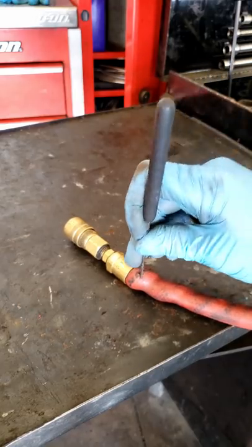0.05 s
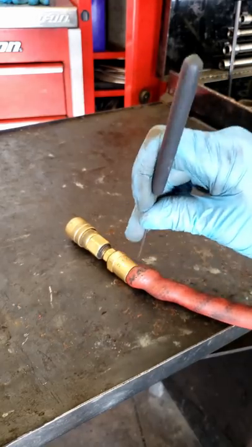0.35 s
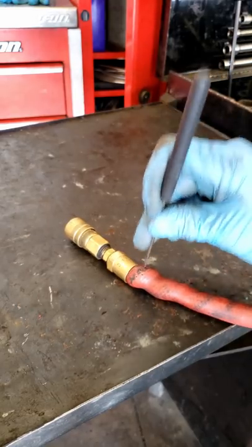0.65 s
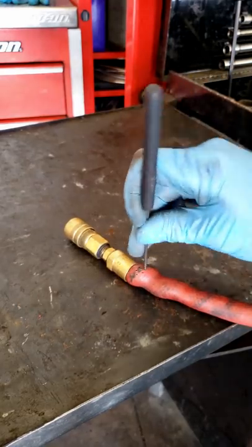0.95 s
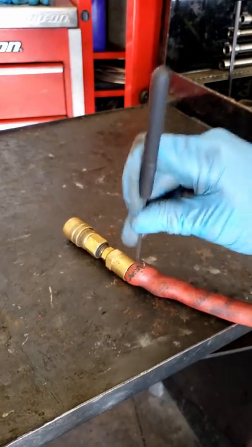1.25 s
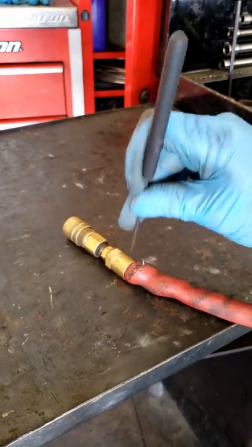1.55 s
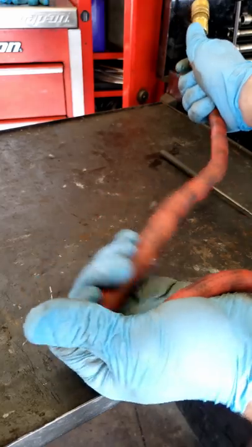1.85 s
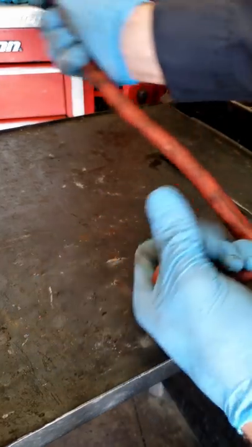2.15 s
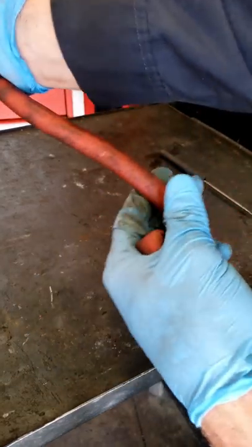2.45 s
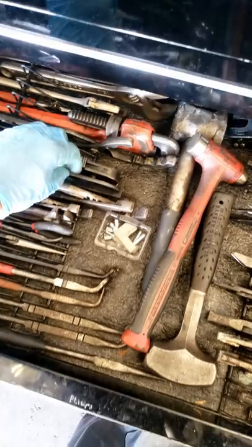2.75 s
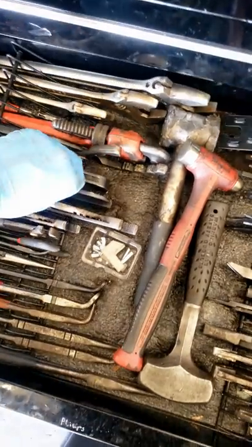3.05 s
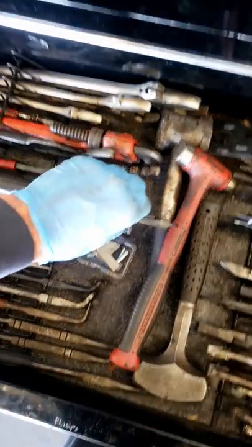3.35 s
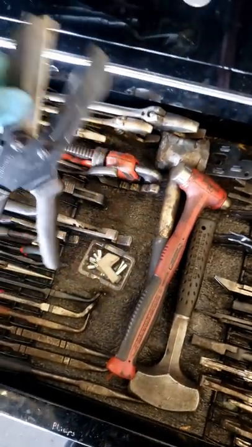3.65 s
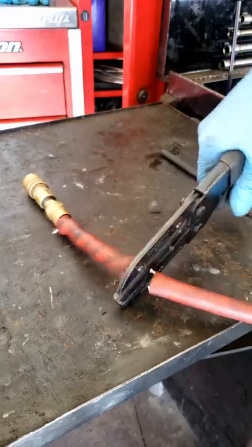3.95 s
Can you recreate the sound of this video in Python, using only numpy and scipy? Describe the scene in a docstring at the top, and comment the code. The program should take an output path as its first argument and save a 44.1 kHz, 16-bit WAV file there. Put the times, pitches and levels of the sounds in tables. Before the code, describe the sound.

Compressed air hisses loudly from a split hose close to the microphone, fluttering, then stops short. A faint leak lingers, a fan hums in the workshop, steel tools clink in a drawer, and the hiss bursts back.

```python
"""A loud, fluttering hiss stops short; then, abruptly, a fan hums, tools clink and a hiss breaks out.
Compressed air jets from a split hose beside its brass fitting while a gloved hand moves in the stream.
The hose is kinked shut, the workshop rings out, a little air seeps through and a far engine speeds up.
The second scene is at a tool chest beside the fan: steel tools knock together and ring as pliers are
pulled out, the drawer thumps, and the loud hiss returns."""
import sys
import numpy as np
from scipy import signal
from scipy.fft import rfft, irfft, next_fast_len
from scipy.io import wavfile
from scipy.ndimage import map_coordinates

SR = 44100
rng = np.random.default_rng(int(sys.argv[2]) if len(sys.argv) > 2 else 0)


def bounce(signal):
    """Save signal as a 16-bit WAV file at the path given by the first command-line argument."""
    frames = np.transpose(np.atleast_2d(signal))
    limited = np.clip(frames, -1, 1)
    pcm = np.round(limited * 32767).astype(np.int16)
    wavfile.write(sys.argv[1], SR, pcm)


N = 176400


def amp(db):
    """Turn decibels into a gain."""
    return 10 ** (np.asarray(db) / 20)


def unit(x):
    """Scale so that the average of the two channels has an rms level of 1."""
    return x / np.sqrt(np.mean(np.atleast_2d(x).mean(0) ** 2) + 1e-20)


def along(points, hz):
    """Read between (frequency [Hz], value) points on a log frequency axis."""
    freqs, values = np.transpose(points)
    return np.interp(np.log(hz + 1), np.log(freqs + 1), values)


def clock():
    """The time of every sample, in seconds."""
    return np.arange(N) / SR


def curves(rows):
    """One value per sample for each column after the time."""
    times, *columns = np.transpose(rows)
    return [np.interp(clock(), times, column) for column in columns]


def wobble(rate):
    """A smooth curve through `rate` random values a second."""
    return map_coordinates(rng.standard_normal(int(N * rate / SR) + 4), [clock() * rate], mode="nearest")


def filtered(x, response):
    """Multiply each frequency in x by response(hz)."""
    size = next_fast_len(N + 8192)
    return irfft(rfft(x, size) * response(np.fft.rfftfreq(size, 1 / SR)), size)[..., :N]


def pan(left_db):
    """Two gains that make the left side left_db louder than the right."""
    return amp(np.array([[.5], [-.5]]) * left_db)


def colour(points):
    """A tone colour: gain by frequency, from (frequency [Hz], level [dB]) points."""
    return lambda hz: amp(along(points, hz))


def resonant(points, peaks):
    """A broad tone colour with narrow resonances on it."""
    return lambda f: amp(along(points, f)
                         + sum(db / (1 + (2 * (f - hz) / width) ** 2) for hz, width, db in peaks))


def noise(gain, mono_hz=500):
    """Stereo noise of a given colour, alike on both sides below mono_hz."""
    def response(hz):
        spread = np.arccos(1 / (1 + (hz / mono_hz) ** 2)) / 2
        return gain(hz) * np.array([np.cos(spread), np.sin(spread)])
    mid, side = filtered(rng.standard_normal((2, N)), response)
    return unit(np.array([mid + side, mid - side]))


def add(track, start_s, sound):
    """Mix a sound into the track at start_s."""
    part = track[:, round(start_s * SR):][:, :sound.shape[-1]]
    part += sound[..., :part.shape[1]]


def lagged(x, lag_ms=0.28, top_hz=1060):
    """Low notes reach the right side first; above top_hz this head start fades away."""
    phase = lambda hz: np.pi * hz * lag_ms / 1000 / (1 + (hz / top_hz) ** 4)
    return filtered(x, lambda hz: np.exp(1j * phase(hz) * np.array([[-1], [1]])))


def workshop_echo(x):
    """The room rings on after a sound; each frequency dies at its own speed."""
    # how long the room rings: (frequency [Hz], time to fade by 60 dB [s])
    ring_times = [(150, 0.32), (1000, 0.69), (3500, 0.77), (8000, 0.82), (15000, 0.42)]
    hz, t, spectrum = signal.stft(rng.standard_normal((2, SR)), SR, nperseg=256)
    fade = amp(-60 * t / along(ring_times, hz)[:, None])
    tail = signal.istft(spectrum * fade, SR, nperseg=256)[1]
    return signal.fftconvolve(x.mean(0)[None], tail / np.linalg.norm(tail[0]), axes=1)[:, :N]


def distant_engine():
    """An engine fires faster and faster, so its drone rises over the quiet of the shop."""
    # the drone: (time [s], firing rate [Hz], lowest tone [dB], tone an octave up [dB])
    revs = [(1.55, 65.2, -88, -75), (1.76, 69.5, -60, -59.5), (1.92, 72.5, -54.5, -62.5),
            (1.96, 74, -55.5, -52.5), (2.24, 80, -47.5, -52), (2.32, 82.5, -49.5, -53.5),
            (2.6, 86.1, -49.5, -57.5), (2.7, 88.4, -52, -57.5)]
    # the quiet shop's noise: (frequency [Hz], relative level [dB])
    quiet_colour = [(18, -49), (30, -8), (50, -13.5), (85, -9), (171, -13.5), (355, -19), (716, -23),
                    (8690, -32.5), (15000, -52)]
    hz, first_db, second_db = curves(revs)
    phase = 2 * np.pi * np.cumsum(hz * (1 + 0.0051 * wobble(20))) / SR
    first, second, third = np.sin(np.outer([1, 2, 3], phase))
    tones = amp(first_db) * first + amp(second_db) * (second + amp(-16.5) * third)
    engine = np.sqrt(2) * tones * pan(left_db=2.5) * amp(0.67 * wobble(12.2))
    return engine + amp(-63) * noise(colour(quiet_colour), mono_hz=400) * pan(left_db=6.5)


def fan():
    """Rushing air with rough, unsteady motor and blade tones."""
    # loudness of the rushing air: (time [s], level [dB])
    levels = [(2.7, -36.5), (3.15, -35), (3.3, -41.5), (3.8, -41), (4, -41.5)]
    # its colour: (frequency [Hz], relative level [dB])
    air_colour = [(20, -18), (45, 3.5), (75, -3), (110, 5.5), (140, -4.5), (200, 5), (310, -10),
                  (700, -4.5), (1500, -8.5), (3500, -13), (5500, -18), (8000, -29), (12000, -26.5),
                  (15700, -27)]
    # motor and blade tones: (frequency [Hz], level over the air [dB])
    tones = [(109, -14.5), (172, -11.5), (242, -6.5), (280, -16), (333, -15), (388, -12.5), (500, -22),
             (609, -16), (724, -16), (917, -19.5)]
    # the air leans left: (frequency [Hz], left over right [dB])
    balance = [(200, 4.4), (800, 3.7), (3500, 6.1), (10000, 2)]
    hum = sum(amp(db + 2.5 * wobble(12)) * np.sin(2 * np.pi * hz * clock() + .8 * wobble(16))
              for hz, db in tones)
    air = noise(colour(air_colour), mono_hz=1040)
    air = unit(filtered(air, lambda hz: pan(along(balance, hz))))
    return amp(curves(levels)[0]) * (air + np.sqrt(2) * hum)


def hose_rumble(at_s=1.79, width_s=0.18, db=-55):
    """The rubber hose rumbles softly as it is lifted off the bench."""
    rumble = noise(colour([(60, -14), (130, 9.0), (260, -1.0), (430, -4), (700, -27)]))
    swell = np.exp(-((clock() - at_s) / width_s) ** 4)
    return rumble * amp(db + 1.4 * wobble(18)) * swell


def glove_rustle(at_s=2.895, width_s=0.042, db=-47):
    """The glove brushes over the tools."""
    rustle = noise(colour([(500, -20), (2800, 8), (7000, -6), (13000, -3)]))
    swell = np.exp(-((clock() - at_s) / width_s) ** 2)
    return rustle * pan(left_db=7) * amp(db + 2.4 * wobble(200)) * swell


def seeping_air():
    """A thin, hollow hiss gets past the kink."""
    # loudness of the leak: (time [s], level [dB])
    levels = [(2.36, -71), (2.42, -59), (2.46, -50), (2.55, -54), (2.65, -54), (2.72, -53), (3.15, -55),
              (3.35, -66)]
    # its colour: (frequency [Hz], relative level [dB])
    leak_colour = [(1000, -20), (2300, -13), (3400, -7.5), (4600, -7), (7000, -12), (9400, -12.5),
                   (11000, -3), (15500, -2)]
    # its resonances: (frequency [Hz], width [Hz], boost [dB])
    peaks = [(2800, 250, 3), (3490, 460, 5), (4300, 360, 2), (4780, 300, 5.5), (5600, 400, 3),
             (6700, 330, 6), (7800, 450, 1), (8670, 300, 6), (10100, 350, 3), (13000, 350, 1)]
    hiss = unit(noise(resonant(leak_colour, peaks)) * pan(left_db=11))
    return hiss * amp(curves(levels)[0] + 0.42 * wobble(20))


def drawer_thumps(attack_s=0.00098, scatter_db=.7):
    """The sheet-steel drawer booms; soft bumps stir only its lowest tones."""
    # bumps: (time [s], relative level [dB], tones weaken above [Hz])
    bumps = [(2.89, -37, 132), (3.1941, -12.5, 800), (3.202, -10.5, 850), (3.2106, -11, 850),
             (3.223, -7.5, 82), (3.2383, -30, 545), (3.383, -22, 99), (3.854, -23.5, 90), (3.881, -24, 90),
             (3.905, -19, 95), (3.947, -29, 130), (3.9615, -24.5, 403)]
    # the drawer's tones: (frequency [Hz], relative level [dB], time to fade by 60 dB [s])
    tones = [(62, -12, .08), (103, -1.8, .09), (174, -.6, .08), (225, -11, .14), (289, 2, .1),
             (352, 4.8, .04), (385, -9.7, .14), (498, -12, .12), (580, -13.5, .13), (728, -12, .11),
             (995, -18, .09), (1230, -18, .1)]
    out, t = np.zeros((2, N)), np.arange(SR // 3) / SR
    for start_s, db, soft_hz in bumps:
        boom = np.zeros_like(t)
        for hz, tone_db, fade_s in tones:
            fade = amp(tone_db + rng.normal(0, scatter_db) - 60 * t / fade_s)
            tone = np.sin(2 * np.pi * hz * (1 + rng.normal(0, 0.0046)) * t)
            boom += fade * tone / (1 + (hz / soft_hz) ** 2)
        add(out, start_s, amp(db + 1.5) * boom * (1 - np.exp(-t / attack_s)))
    return out * pan(left_db=3)


def steel_ring(tones):
    """Struck steel; each blow stirs its tones a little differently."""
    t = np.arange(SR // 3) / SR
    return sum(amp(db + rng.normal(0, 1.4) - 60 * t / fade_s)
               * np.sin(2 * np.pi * hz * t + rng.normal(0, 1.0, (2, 1))) for hz, db, fade_s in tones)


def tool_clinks(crack_fade_s=0.041, clatter_fade_s=0.15, attack_s=0.00047):
    """Each knock gives a bright crack, rings two tools and rattles the drawer's contents."""
    # knocks, in relative levels: (time [s], overall [dB], clatter [dB], heavy tool [dB], light tool [dB])
    knocks = [(3.0428, -21, 1.5, -9, -20), (3.059, -18, -2, -8, -4), (3.1675, -20, -7, -18, -6),
              (3.18, -11.5, -15.5, -16, -10), (3.183, -13.5, -15, 3.5, -12), (3.201, -21, 1, -12, -4),
              (3.2085, -17.5, -4.5, -7, -14), (3.2107, -15, -9, -19, -17), (3.3749, -22, -15, -16, 3.5),
              (3.9612, -22, -12, -18, -10)]
    # each tool's tones: (frequency [Hz], relative level [dB], time to fade by 60 dB [s])
    heavy_tool = [(1630, 0.5, 0.048), (3250, -12, .1), (4030, -20, 0.095), (5480, -12, 0.075),
                  (5846, -13, .05), (10350, -18, .035), (11100, -13, 0.1), (13800, -14, .05)]
    light_tool = [(2700, -17, .07), (6110, -3, 0.025), (11400, -4, 0.025), (13040, -14, .04)]
    # colours of the clatter and the crack: (frequency [Hz], relative level [dB])
    clatter_colour = [(60, -18), (200, -3), (380, 5.5), (750, 1), (1500, -7.5), (4000, -20), (12000, -49)]
    crack_colour = [(500, -46), (2500, 4.5), (6000, 2), (9000, -3.5), (13500, -1), (15700, -4.5)]
    crack_noise = noise(colour(crack_colour), mono_hz=1980)
    clatter_noise = noise(colour(clatter_colour), mono_hz=1460)
    out = np.zeros((2, N))
    for start_s, db, clatter_db, heavy_db, light_db in knocks:
        ring = amp(heavy_db) * steel_ring(heavy_tool) + amp(light_db) * steel_ring(light_tool)
        add(out, start_s, amp(db - 7.5) * ring)
        age = np.maximum(clock() - start_s, 0)
        crack = crack_noise * amp(-11 - 60 * age / crack_fade_s)
        clatter = clatter_noise * amp(clatter_db - 8.5 - 60 * age / clatter_fade_s)
        out += amp(db) * (1 - np.exp(-age / attack_s)) * (crack + clatter)
    return out * pan(left_db=5.5)


def air_spurts(attack_s=.001):
    """A bright hiss returns in steps that each start abruptly and fade."""
    # spurts: (time [s], level [dB], fade [dB/s], left over right [dB])
    spurts = [(3.836, -34, 60, 7), (3.961, -20, 750, 11), (3.969, -23, 35, 4), (3.9754, -17, 400, 7)]
    # their colour: (frequency [Hz], relative level [dB])
    spurt_colour = [(100, 2), (600, -4), (2000, -2.5), (3600, -2.5), (4500, -4.5), (5600, -1), (7200, -5),
                    (9000, -3), (12000, 3.5), (15500, 4)]
    # their resonances: (frequency [Hz], width [Hz], boost [dB])
    peaks = [(2960, 210, 8.5), (3550, 160, 5), (3900, 140, 8), (4750, 130, 5), (5300, 230, 4.5),
             (6130, 150, 9), (13400, 250, -1)]
    out = np.zeros((2, N))
    for start_s, db, fade_db_per_s, left_db in spurts:
        age = np.maximum(clock() - start_s, 0)
        hiss = unit(noise(resonant(spurt_colour, peaks)) * pan(left_db))
        out += hiss * amp(db - fade_db_per_s * age) * (1 - np.exp(-age / attack_s))
    return out


def hand_echo(x, delay_ms=1.119, drift=0.262, db=-14):
    """Sound bounces off the moving glove; the delayed copy gives the hiss a shifting colour."""
    delay_samples = delay_ms * np.exp(drift * wobble(3)) * SR / 1000
    echo = np.array([map_coordinates(side, [np.arange(N) - delay_samples]) for side in x])
    return (x + amp(db) * echo) / np.hypot(1, amp(db))


def air_jet(shut_s=1.954, shut_db_per_s=656):
    """Swirling air in three bands that swell as the hand deflects the stream, until the kink stops it."""
    # loudness of the low, middle and high bands: (time [s], relative level [dB])
    roar_levels = [(0, -47), (.108, -52), (.162, -43), (.29, -53), (.378, -44), (.496, -48), (.512, -53),
                   (.626, -38), (.658, -52.5), (.734, -38.5), (.782, -52.5), (.814, -42), (.87, -47),
                   (.896, -41.5), (.918, -45.5), (.972, -36.5), (.988, -42.5), (1.058, -38), (1.15, -44),
                   (1.28, -39), (1.448, -43), (1.474, -37.5), (1.502, -51), (1.522, -40), (1.712, -45.5),
                   (1.918, -46), (1.94, -49)]
    hiss_levels = [(0, -39), (.1, -42.5), (.178, -40.5), (.21, -34.5), (.27, -39), (.69, -39),
                   (.714, -32.5), (.77, -38.5), (1.01, -32.5), (1.188, -33), (1.232, -29.5), (1.36, -36),
                   (1.385, -29.5), (1.512, -37), (1.534, -29.5), (1.66, -37.5), (1.8, -38), (1.9, -34),
                   (1.94, -36)]
    sizzle_levels = [(.086, -29), (.134, -34.5), (.34, -28), (.382, -33), (.556, -27.5), (.594, -32),
                     (.702, -25), (.81, -28.5), (.998, -27.5), (1.512, -28), (1.528, -24.5), (1.614, -27.5),
                     (1.642, -24.5), (1.912, -24.5), (1.94, -28)]
    # the jet's colour: (frequency [Hz], relative level [dB])
    jet_colour = [(100, -38), (220, -21), (560, -18), (830, -14.5), (1200, -12.5), (1500, -12),
                  (2400, -6.5), (3250, -1), (3700, -1), (4250, -4.5), (4850, -2), (5700, -7.5), (7500, -11),
                  (8900, -12), (10500, -4.5), (12300, -1.5), (13800, -1.5), (15600, -0.5)]
    # the jet leans left: (frequency [Hz], left over right [dB])
    balance = [(300, 5.5), (900, 7.5), (1600, 4), (3500, 11), (7000, 10), (12000, 11.5), (15500, 15)]
    flutter_db = .5 * wobble(35.4)  # shared by all three bands

    def band(levels, low_hz, high_hz, db, flicker_db):
        edges = lambda hz: np.sqrt((1 + (low_hz / (hz + 1)) ** 10) * (1 + (hz / high_hz) ** 10))
        air = noise(lambda hz: colour(jet_colour)(hz) / edges(hz), mono_hz=118)
        air = unit(filtered(air, lambda hz: pan(along(balance, hz))))
        return air * amp(curves(levels)[0] + db + flutter_db + flicker_db * wobble(24))

    roar = band(roar_levels, 70, 2050, db=0.32, flicker_db=1.3)
    hiss = band(hiss_levels, 1800, 8740, db=0.5, flicker_db=1.0)
    sizzle = band(sizzle_levels, 6250, 18500, db=1.27, flicker_db=0.96)
    choke = amp(-shut_db_per_s * np.maximum(clock() - shut_s, 0))
    return hand_echo(roar + hiss + sizzle) * choke


def scene(chest_s=2.703, bright_hz=1100):
    """Mix the sources and the room; from chest_s on, the listener stands at the tool chest."""
    air = air_jet() + seeping_air() + air_spurts()
    knocks = lagged(tool_clinks() + drawer_thumps())
    # the air stirs the room mostly above bright_hz
    air_room = filtered(workshop_echo(air), lambda hz: hz / np.hypot(hz, bright_hz))
    room = amp(-10.5) * air_room + amp(-17.5) * workshop_echo(knocks)
    at_chest = np.clip((clock() - chest_s) / 0.0008, 0, 1)
    background = (1 - at_chest) * distant_engine() + at_chest * lagged(fan())
    return background + room + hose_rumble() + glove_rustle() + knocks + air


def record(dry, low_hz=53, top_hz=15780):
    """The microphone loses the deepest bass and keeps nothing above top_hz."""
    low_cut = lambda hz: (1j * hz) ** 2 / (low_hz ** 2 - hz ** 2 + 1j * hz * low_hz)
    return filtered(dry, lambda hz: low_cut(hz) * (hz < top_hz))


dry = scene()
out = record(dry)
bounce(out)
```